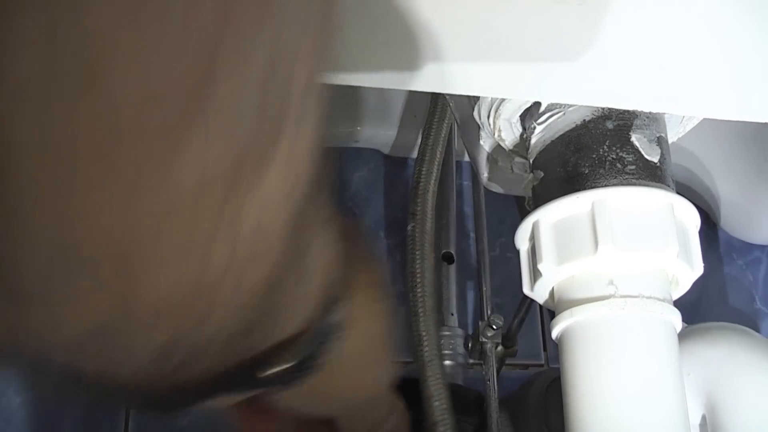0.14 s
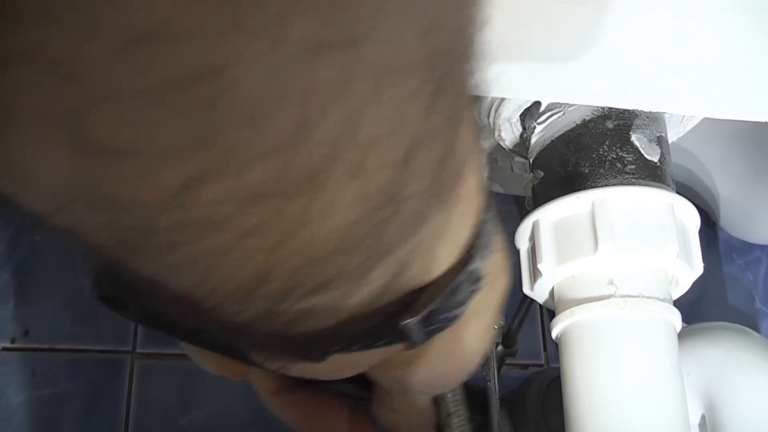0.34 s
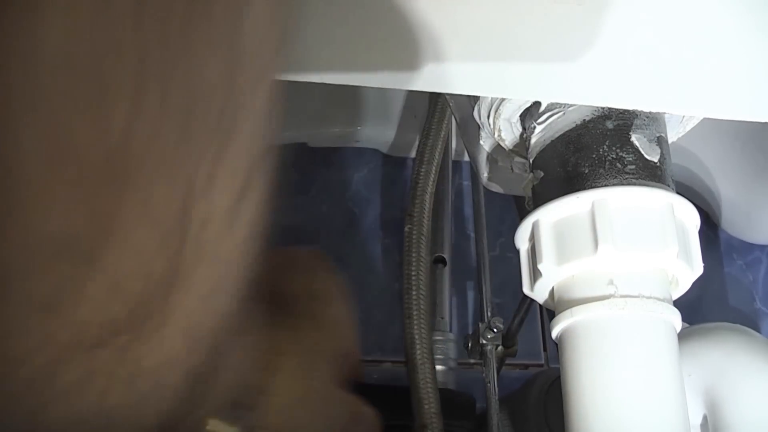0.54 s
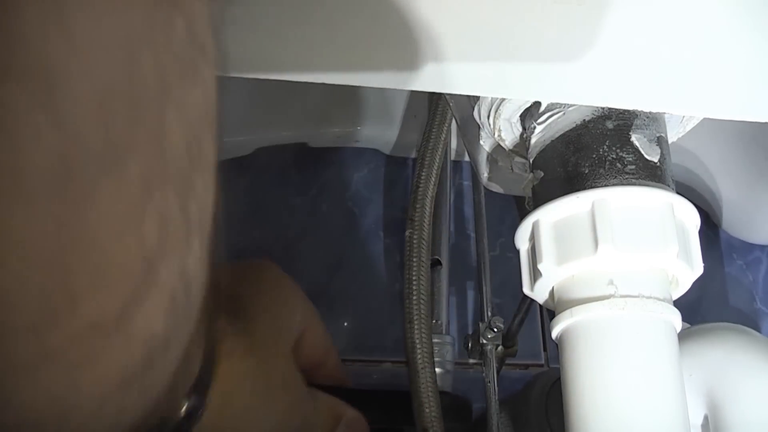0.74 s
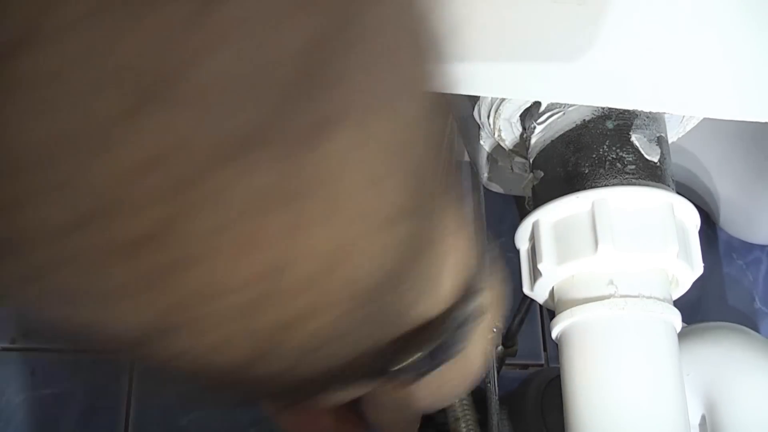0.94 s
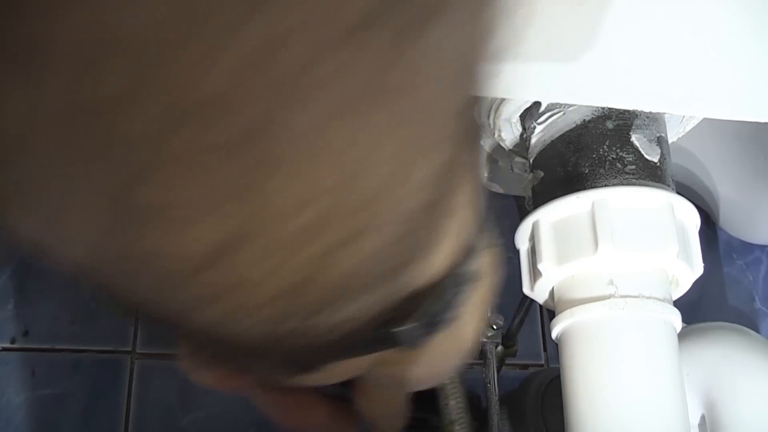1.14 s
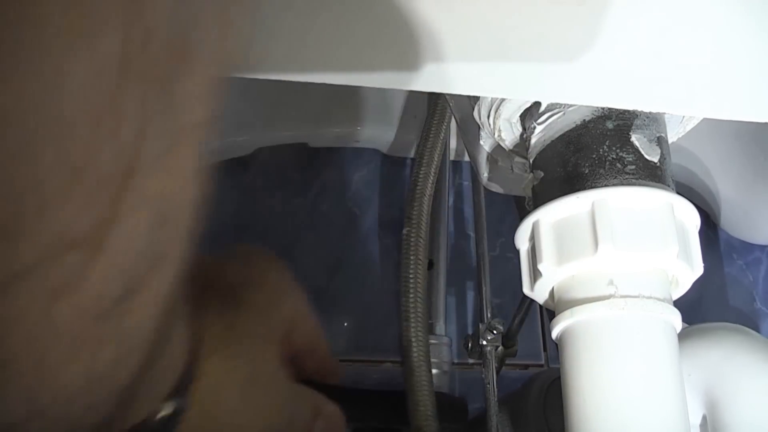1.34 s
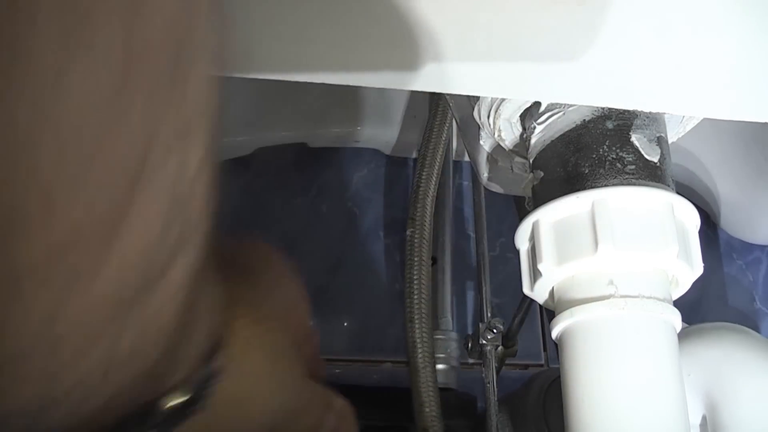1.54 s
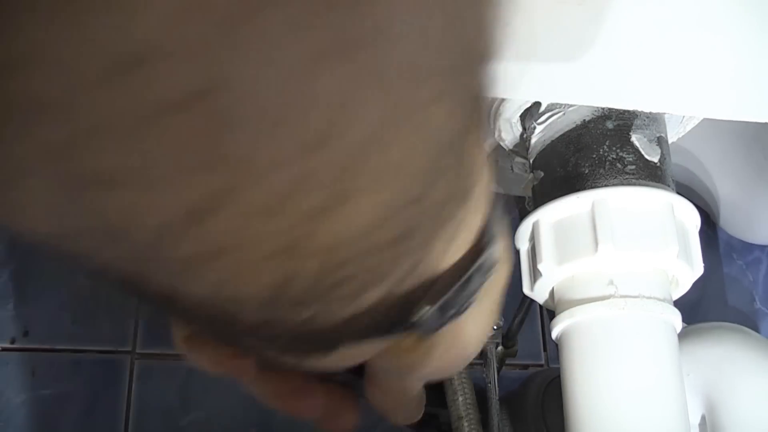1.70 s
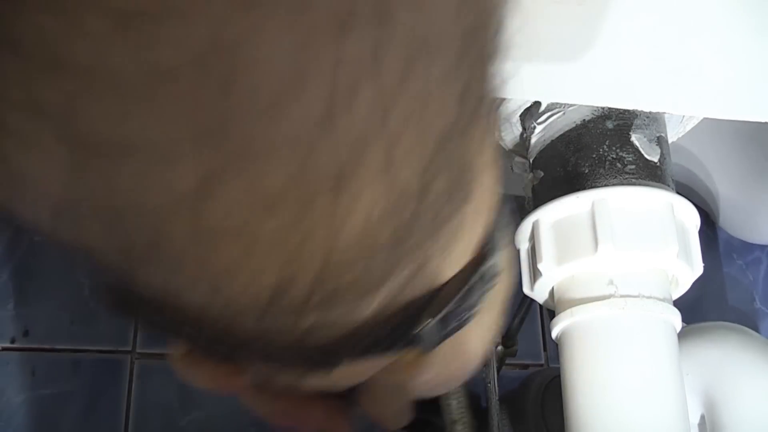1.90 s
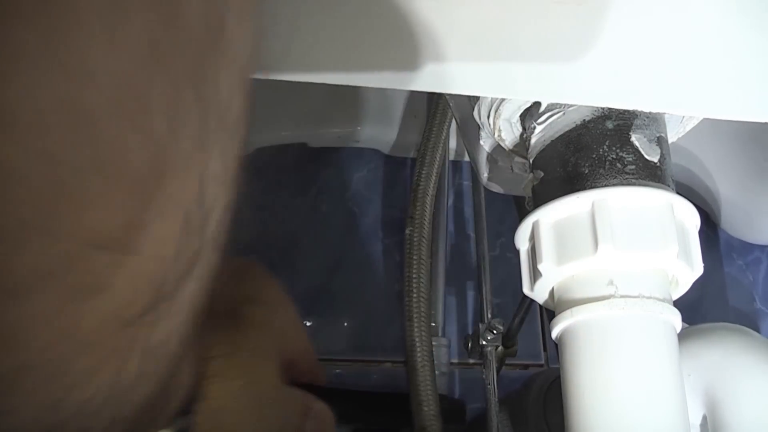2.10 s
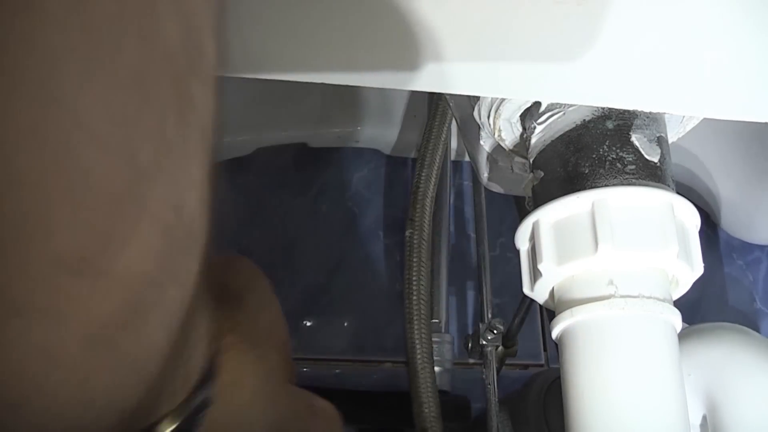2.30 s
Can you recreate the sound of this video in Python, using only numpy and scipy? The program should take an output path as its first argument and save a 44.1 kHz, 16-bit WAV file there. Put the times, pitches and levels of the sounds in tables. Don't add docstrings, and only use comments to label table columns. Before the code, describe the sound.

A socket ratchet snaps in three short bursts, its handle knocking plastic pipes and basin, with skin and strap scuffs and faint low thumps between; close microphone in a small, hard, quiet space under a sink.

```python
import sys
import numpy as np
from scipy import signal
from scipy.fft import rfft, irfft
from scipy.io import wavfile
from scipy.ndimage import uniform_filter1d

SR = 44100
rng = np.random.default_rng(int(sys.argv[2]) if len(sys.argv) > 2 else 0)


def int16_out(signal):
    q = np.round(np.clip(np.atleast_2d(signal).T, -1, 1) * 32767)
    wavfile.write(sys.argv[1], SR, q.astype(np.int16))


def convert_level_to_amplitude(level_db):
    exponent = np.asarray(level_db, float) / 20
    return 10 ** exponent


N = 103635


def rms_one(x):
    return x / np.sqrt(np.mean(x ** 2) + 1e-20)


def butter(x, order, hz, kind):
    return signal.sosfilt(signal.butter(order, hz, kind, fs=SR, output="sos"), x)


def ring(x, hz, t60):
    r, w = convert_level_to_amplitude(-60 / (t60 * SR)), 2 * np.pi * hz / SR
    return signal.lfilter([0, np.sin(w)], [1, -2 * r * np.cos(w), r * r], x + 1e-18)


def coloured(x, points):
    hz, db = np.transpose(points)
    f = np.fft.rfftfreq(len(x), 1 / SR) + 1
    gain = convert_level_to_amplitude(np.interp(np.log(f), np.log(hz), db, left=db[0] - 64))
    return rms_one(irfft(rfft(x) * gain, len(x)))


def grains(per_s, spread_db, size):
    present = rng.random(size) < per_s / SR
    strength = convert_level_to_amplitude(spread_db * np.minimum(rng.exponential(1, size), 3))
    return present * strength * rng.choice([-1, 1], size)


def contact(length_s, per_s):
    t = np.arange(2048) / SR / max(length_s, 1e-4)
    x = grains(per_s, 2.7, size=2048) * (t + 0.34) * np.exp(-2.2 * t ** 2)
    x[0] = 1.0
    return x / np.sqrt(np.sum(x ** 2))


def strike(rows, modes, per_s, weight_db, spread_db):
    modes = np.array(modes)
    drive = np.zeros((len(modes), N + 2048))
    for s, db, colour, length in rows:
        touch, i = convert_level_to_amplitude(db) * contact(length, per_s), int(s * SR)
        uneven = spread_db * rng.standard_normal(len(modes))
        gains = convert_level_to_amplitude(modes[:, 1] + weight_db(modes[:, 0], colour) + uneven)
        drive[:, i:i + 2048] += gains[:, None] * touch
    return sum((-1) ** k * ring(drive[k, :N], hz, t60) for k, (hz, _, t60) in enumerate(modes))


def dense(rows, per_s, low_hz, high_hz, weight_db, t60, damping, spread_db, crack_db, count):
    out, t, f = np.zeros(N + 8192), np.arange(6000) / SR, np.fft.rfftfreq(6000, 1 / SR) + 1
    hz = np.geomspace(low_hz, high_hz, count)[:, None]
    masks = np.clip(1 - np.abs(np.log(f / hz) / np.log(hz[1] / hz[0])), 0, 1)
    dying = convert_level_to_amplitude(-120 * t / (t60 * (hz / 3000) ** -damping))
    for s, db, colour, length in rows:
        shape = masks * convert_level_to_amplitude(weight_db(hz, colour) + spread_db * rng.standard_normal((count, 1)))
        touch = contact(length, per_s)
        energy = irfft(rfft(dying, 8192) * rfft(touch ** 2, 8192))[:, :6000]
        noise = irfft(rfft(rng.standard_normal(6000)) * shape, 6000)
        body = np.sum(noise * np.sqrt(np.abs(energy) + 1e-12), axis=0)
        crack = irfft(shape.sum(axis=0), 6000)[:400]
        body[:2447] += convert_level_to_amplitude(crack_db) * signal.fftconvolve(crack, touch)
        i = int(s * SR)
        out[i:i + 6000] += convert_level_to_amplitude(db) * body * np.linspace(1, 0, 6000)
    return out[:N]


# f/Hz, level/dB [per Hz]
ROOM_TONE = [(25, -63), (100, 12), (250, -12.5), (350, 10.5), (480, -9.5), (2000, -18), (9000, -27),
             (16000, -35)]


def room_tone():
    return convert_level_to_amplitude(-56.5) * coloured(rng.standard_normal(N), ROOM_TONE)


# f/Hz, level/dB, t60/s
BASIN = [(110, 5.5, 0.37), (155, 8.5, 0.17), (221.2, 4, 0.17), (244.5, -0.5, 0.14), (316, -9, 0.24),
         (383.6, 1, 0.22), (454.5, 0.5, 0.16), (509, -7, 0.067), (560, -2.5, 0.082), (669, -4, 0.14),
         (707, -6.5, 0.054), (757.4, -1, 0.081), (866, -1.5, 0.024)]
# f/Hz, level/dB, t60/s
PIPES = [(1100, 0.5, 0.057), (1150, -8.5, 0.082), (1058, -15, 0.018), (1424, -13.5, 0.28),
         (1512, -9.5, 0.26), (1601, -11, 0.3), (1630, -0.5, 0.081), (2033, 1.5, 0.045), (2970, -2.5, 0.052),
         (3083, 7.5, 0.023), (3310, -12.5, 0.024), (3570, 6, 0.024), (4300, 0, 0.033), (5160, -24, 0.016)]
# t/s, level/dB
HAND_LOAD = [(0, -80), (.1, -60.5), (0.171, -45.5), (.3, -38.5), (.44, -52.5), (.56, -58), (.65, -51.5),
             (0.778, -77.5), (.9, -43), (1.1, -44), (1.23, -38.5), (1.35, -50), (1.55, -60), (1.66, -43.5),
             (1.84, -47), (2.05, -54), (2.22, -61.5), (2.35, -64)]


def load():
    creaks_per_s, treble_cut_hz, trim_db = 2500, 950, 4
    murmur = np.zeros(N)
    for hz, level, t60 in BASIN + PIPES[:9]:
        mode = ring(grains(creaks_per_s, 3.9, size=N), hz, 0.23 * t60)
        murmur += convert_level_to_amplitude(level - 1.73 * np.log2(1 + hz / treble_cut_hz)) * rms_one(mode)
    s, db = np.transpose(HAND_LOAD)
    return convert_level_to_amplitude(trim_db + np.interp(np.arange(N) / SR, s, db)) * rms_one(murmur)


# t/s [start], length/s, level/dB
SCUFFS = [(0.054, 0.082, -51), (0.13, 0.059, -52.5), (0.417, 0.049, -41.5), (0.45, 0.035, -39),
          (0.545, 0.11, -54), (0.611, 0.043, -42), (0.807, 0.045, -58), (1.185, 0.011, -34),
          (1.194, 0.013, -35), (1.206, 0.034, -36), (1.347, 0.15, -47), (1.539, 0.035, -53),
          (1.805, 0.031, -53), (1.973, 0.0079, -40), (1.996, 0.042, -34.5), (2.287, 0.013, -77.5),
          (2.296, 0.06, -52.5), (1.937, 0.012, -54)]
# f/Hz, level/dB [per Hz]
SCUFF_COLOUR = [(300, 9), (900, -4), (2020, 0.5), (3150, -5), (5820, -4.5), (10000, -10.5), (16000, -31)]


def scuffs():
    t, stroke = np.arange(N) / SR, np.zeros(N)
    for s, length, db in SCUFFS:
        corners = [s, s + 0.39 * length, s + 0.64 * length, s + 1.01 * length]
        stroke += convert_level_to_amplitude(db) * np.interp(t, corners, [0.0046, 0.67, 0.56, 0.0038])
    flutter = uniform_filter1d(uniform_filter1d(rng.standard_normal(N), size=150), size=150)
    stroke *= convert_level_to_amplitude(1.6 * rms_one(flutter))
    grit = grains(8700, 2.3, size=N) + 0.65 * rng.standard_normal(N)
    return stroke * coloured(grit, SCUFF_COLOUR)


def cabinet(x):
    t60_s, wall_damping, level_db = 0.29, 0.16, -14.5
    t, tail = np.arange(12000) / SR, 0
    for low in 150 * 2 ** np.arange(7):
        band = butter(rng.standard_normal(len(t)), 2, [low, 2 * low], "band")
        tail = tail + band * convert_level_to_amplitude(-60 * t / (t60_s * (low / 2400) ** -wall_damping))
    tail = tail * np.minimum(t / 0.0035, 1) / np.sqrt(np.sum(tail ** 2))
    return convert_level_to_amplitude(level_db) * signal.fftconvolve(x, tail)[:N]


# t/s, level/dB [peak], f/Hz [centre of the blow], contact/s
KNOCKS = [(.119, -30.5, 287, 0.015), (.142, -32, 730, 0.0026), (0.166, -43, 400, 0.013),
          (0.2675, -9, 740, .0001), (.276, -10.5, 318, 0.0023), (.297, -23, 293, 0.0033),
          (0.407, -22, 800, 0.0078), (0.414, -21.5, 480, 0.0012), (.423, -22, 453, 0.0022),
          (.464, -21, 570, 0.0037), (.476, -25, 440, 0.0017), (.632, -30, 302, 0.024),
          (0.851, -30.5, 380, 0.0032), (.864, -22.5, 583, 0.0062), (0.953, -20, 362, 0.0065),
          (1.0633, -10.5, 960, .0001), (1.0645, -13.5, 2520, 0.0045), (1.072, -27, 1610, 0.0068),
          (1.184, -19.5, 980, 0.0043), (1.195, -14.5, 560, 0.00034), (1.208, -18, 534, 0.0017),
          (1.215, -31, 323, 0.001), (1.225, -22.5, 440, .002), (1.24, -29, 397, 0.0034),
          (1.293, -35.5, 2400, 0.013), (1.395, -22.5, 395, .004), (1.407, -24.5, 320, 0.0043),
          (1.42, -51, 1990, 0.027), (1.645, -35.5, 610, 0.013), (1.597, -27, 634, 0.025),
          (1.698, -22.5, 417, 0.0089), (1.739, -32, 1390, 0.017), (1.774, -9.5, 1100, 0.00022),
          (1.7755, -15.5, 3070, 0.0029), (1.786, -27, 1640, 0.009), (1.816, -25, 2500, 0.015),
          (1.9711, -18.5, 486, 0.00039), (1.983, -26.5, 354, 0.00043), (1.989, -28, 298, 0.00074),
          (2.008, -24, 560, 0.005), (2.018, -22.5, 714, 0.0035), (2.0243, -20, 610, 0.00047),
          (2.025, -21, 1800, 0.0028), (2.0628, -20.5, 3350, 0.00016), (2.08, -24, 1330, 0.016),
          (2.07, -20, 219, .0023), (2.285, -37, 1200, 0.0016), (2.29, -28, 204, 0.0017)]
JUDDER_PER_S = 900


def thuds():
    out = np.zeros(N + 4096)
    for s, db, hz, length in KNOCKS:
        touch = np.append(contact(length, JUDDER_PER_S), np.zeros(2048))
        i = int(s * SR)
        out[i:i + 4096] += convert_level_to_amplitude(db + 0.5) * ring(touch, hz, 6.16 / hz)
    return out[:N]


def knocks():
    width_octaves, rings_db, panels_db, treble_db = 1.116, -12, -1, -20

    def near(hz, centre):
        return -6 * (np.log2(hz / centre) / width_octaves) ** 2

    def wide(hz, centre):
        treble = treble_db - 18.0 * np.abs(np.log2(hz / centre / 3.6))
        return np.maximum(near(hz, centre), treble)

    rings = strike(KNOCKS, BASIN[2:] + PIPES, JUDDER_PER_S, near, 1.0)
    panels = dense(KNOCKS, JUDDER_PER_S, 228, 13000, wide, t60=0.052, damping=1,
                   spread_db=0.63, crack_db=23, count=24)
    x = convert_level_to_amplitude(rings_db) * rings + convert_level_to_amplitude(panels_db) * butter(panels, 2, 6000, "low") + thuds()
    return butter(x, 4, 190, "high")


# t/s, level/dB [peak], brightness/dB [per octave], chatter/s, f/Hz [favoured]
PAWL = [(0.1429, -41, -2, 0.0014, 4300), (0.1647, -35.5, -6, 0.0049, 4800), (0.2001, -15, -1, 0.0017, 8800),
        (0.2313, -16, 1, 0.005, 4200), (0.2984, -15.5, -3.5, 0.007, 6400), (0.409, -29.5, -6, 0.02, 3520),
        (0.4565, -25.5, 0, 0.0098, 3800), (0.473, -31.5, -11.5, 0.0034, 2294),
        (0.8621, -25, -9, 0.014, 3600), (0.8717, -24.5, 2, 0.0029, 5000), (0.9153, -12.5, -1, 0.0032, 4980),
        (0.9695, -12, -1.5, 0.0009, 2460), (1.0116, -14.5, -2.5, 0.00096, 4300),
        (1.121, -14.5, -0.5, 0.0023, 3900), (1.128, -21, -7.5, 0.0023, 3600),
        (1.1696, -25, -7, 0.016, 3940), (1.5993, -20, -6, 0.0054, 8400), (1.6472, -12, 0, 0.0044, 4300),
        (1.672, -16.5, 0.5, 0.0048, 4130), (1.7054, -15, 1, 0.003, 6100), (1.7817, -18, -6.5, 0.0029, 5500),
        (1.982, -28.5, -10, 0.0035, 5000), (2.0062, -25.5, -10, 0.00079, 5000),
        (2.0627, -17, -3.5, 0.00049, 3600)]
# f/Hz, level/dB
HEAD = [(1200, -19), (2200, -4.5), (2900, -5), (4300, 0), (6000, -1), (9000, 0), (10800, -8.5),
        (16000, -15)]
# f/Hz, level/dB, t60/s
TEETH = [(2268, -4, 0.046), (2500, -5.5, 0.0067), (3350, -4, 0.041), (3585, 0, 0.038), (4235, -3, 0.038),
         (5000, -9.5, 0.017), (5880, 4, 0.016), (6300, -9.5, 0.028), (6990, -2.5, 0.009), (7484, -14, .03),
         (8570, -4.5, 0.02)]
CHATTER_PER_S = 8200


def pawl():
    favour_octaves, favour_db, rattle_db, rings_db = 0.21, 7.0, -2.5, -10
    hz, db = np.transpose(HEAD)

    def favour(f, centre):
        return np.maximum(-6 * (np.log2(f / centre) / favour_octaves) ** 2, -11)

    def colour(f, tooth):
        tilt, centre = tooth
        head = np.interp(np.log(f), np.log(hz), db) + tilt * np.log2(f / 5000)
        return head + np.maximum(favour_db + favour(f, centre), 0)

    drops = [(s, level, (tilt, centre), length) for s, level, tilt, length, centre in PAWL]
    rattle = dense(drops, CHATTER_PER_S, 1210, 18300, colour, t60=0.054, damping=0.42,
                   spread_db=-1, crack_db=12.0, count=20)
    drops = [(s, level, centre, length) for s, level, _, length, centre in PAWL]
    rings = strike(drops, TEETH, CHATTER_PER_S, favour, 1.5)
    return convert_level_to_amplitude(rattle_db) * rattle + convert_level_to_amplitude(rings_db) * rings


# t/s, level/dB [peak], f/Hz, swell/s
BOOMS = [(0.151, -43.5, 107.2, 0.02), (.31, -48, 109.2, 0.037), (.42, -30, 105, 0.049),
         (.5, -37.5, 100, 0.16), (0.623, -31, 164, 0.014), (.665, -43, 95, 0.026),
         (0.859, -42, 107.5, 0.025), (1.02, -56, 155, 0.0099), (1.209, -28, 108.4, 0.011),
         (1.259, -45, 112, 0.041), (1.401, -31.5, 157.2, 0.015), (1.622, -42.5, 150, 0.061),
         (1.749, -37, 100, 0.0067), (1.97, -25.5, 167.3, 0.008), (2.02, -28.5, 110.9, 0.016),
         (2.119, -39.5, 102.3, 0.02)]


def booms():
    t60_s = 0.17
    t, out = np.arange(N) / SR, np.zeros(N)
    for s, db, hz, length in BOOMS:
        swell = np.exp(-((t - s - length) / (.5 * length)) ** 2)
        tone = np.sin(2 * np.pi * (hz * t + rng.random()))
        push = swell * (tone + 28.0 * rng.standard_normal(N))
        x = ring(push, hz, t60_s) - 0.6 * ring(push, 1.3 * hz, 0.5 * t60_s)
        out += convert_level_to_amplitude(db) * x / np.abs(x).max()
    return butter(out, 4, 320, "low")


# f/Hz, level/dB, t60/s
SOCKET = [(2820, -22, 0.19), (3612, -27, 0.1), (3750, 0, 0.068), (4000, -4, 0.069), (4440, -21, .15),
          (7500, -31, 0.13), (7985, 6.5, 0.021), (8400, 2, .02), (8909, -7, 0.039), (9660, -11, .04)]


def socket():
    tick = (2.0628, -26.5, 0, .002)  # t/s, level/dB, no colour, contact/s
    return strike([tick], SOCKET, CHATTER_PER_S, lambda hz, colour: 0, 0)


def scene():
    rubs, blows, clicks = scuffs(), knocks(), pawl() + socket()
    direct = room_tone() + load() + rubs + blows + clicks + booms()
    return (direct + cabinet(clicks + 1.25 * blows + rubs))[None]


def roll_off(x):
    return signal.sosfilt(signal.butter(12, 16680, fs=SR, output="sos"), x)


def record(dry):
    limit = .42
    x = butter(dry, 3, 72, "high")
    x = signal.sosfilt(signal.cheby2(10, 50, 16500, fs=SR, output="sos"), x)
    return roll_off(limit * np.tanh(x / limit))


dry = scene()
out = record(dry)
int16_out(out)
```